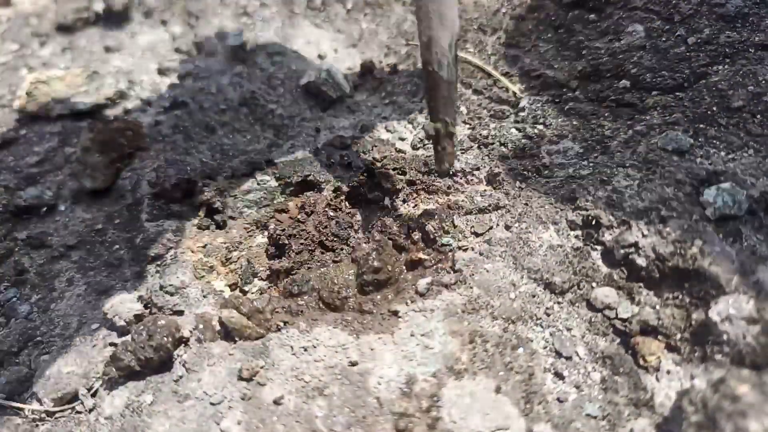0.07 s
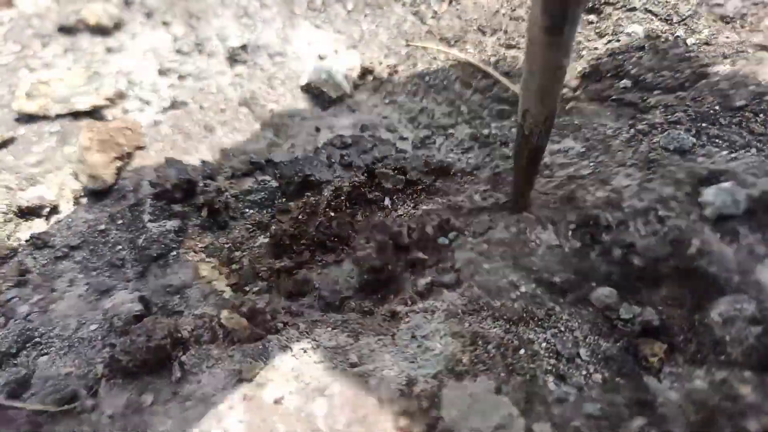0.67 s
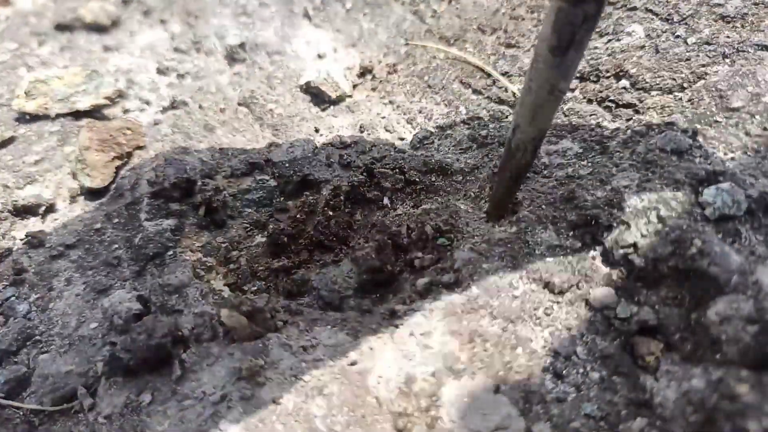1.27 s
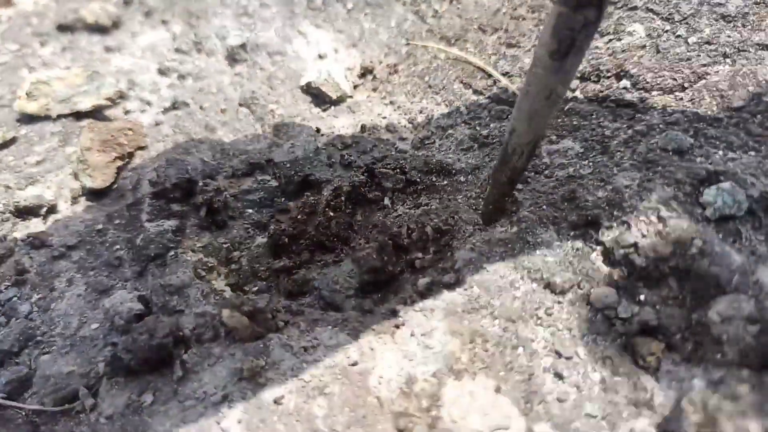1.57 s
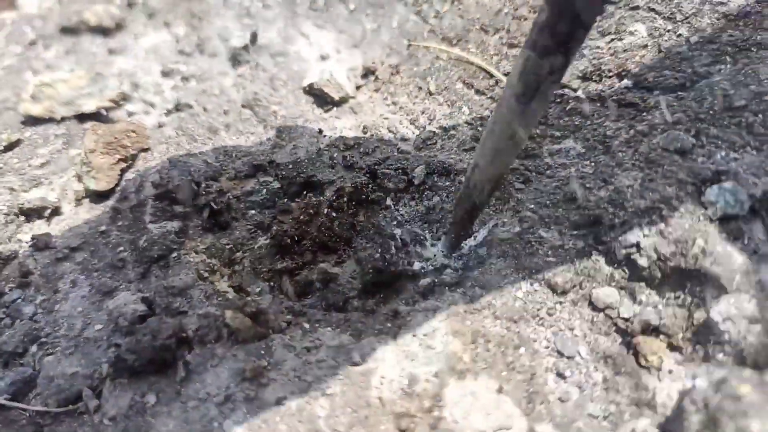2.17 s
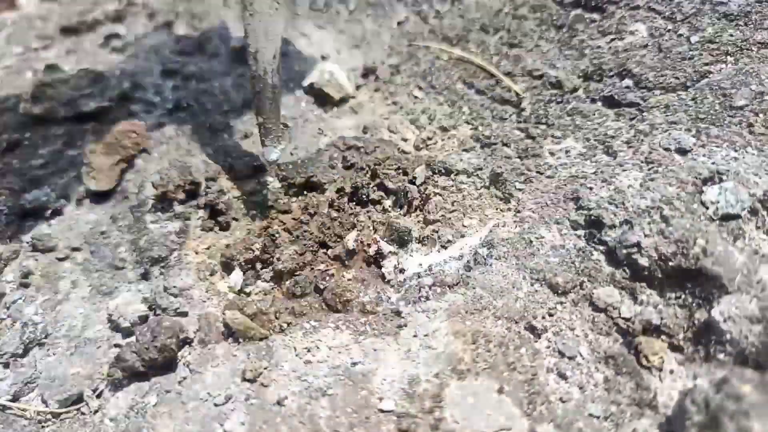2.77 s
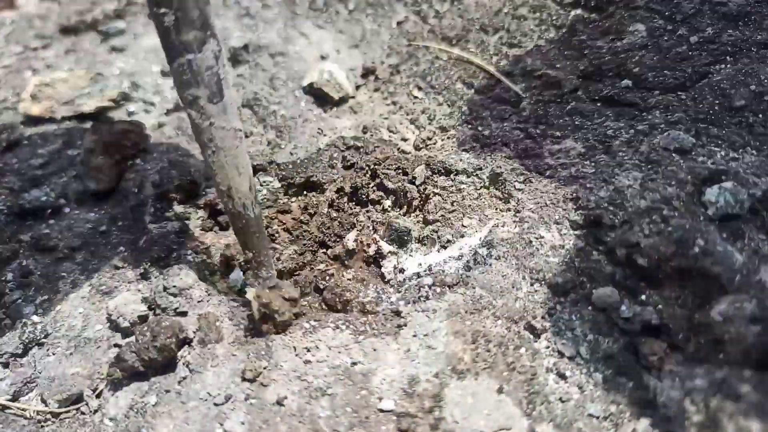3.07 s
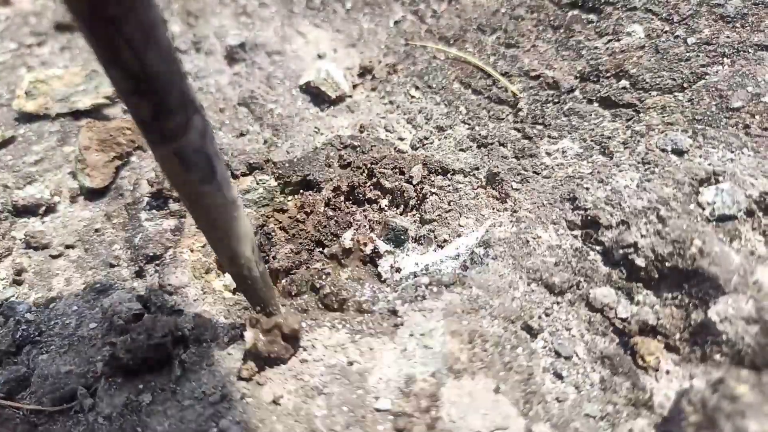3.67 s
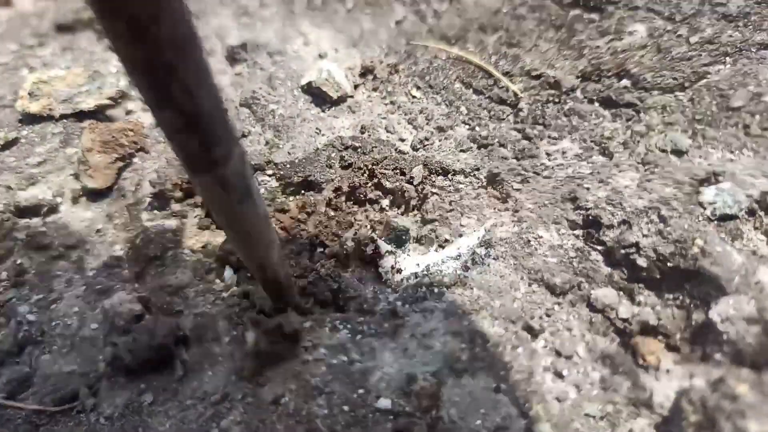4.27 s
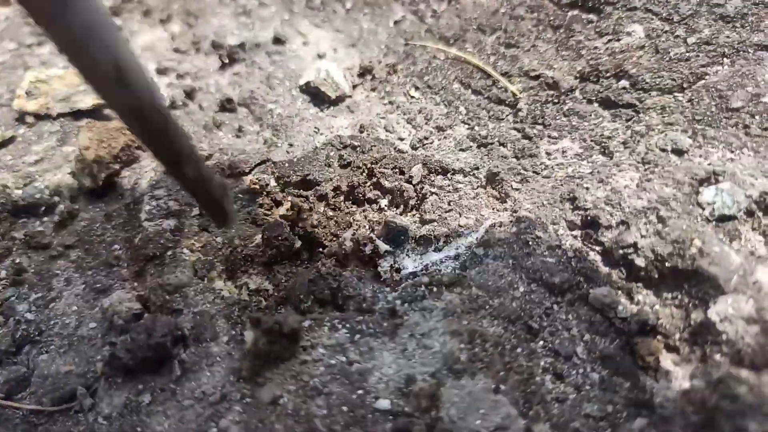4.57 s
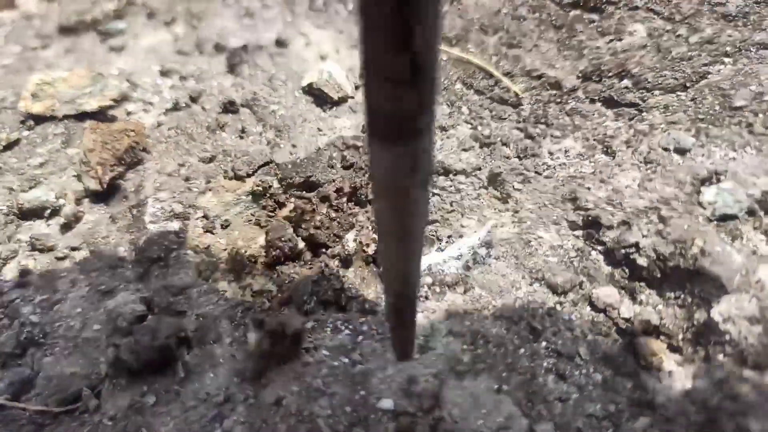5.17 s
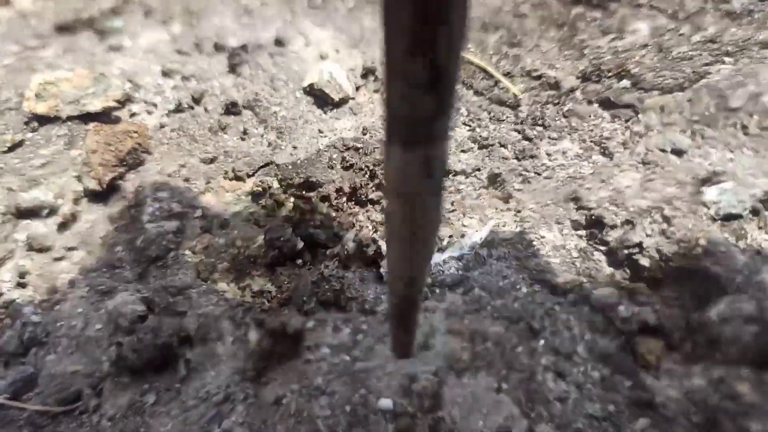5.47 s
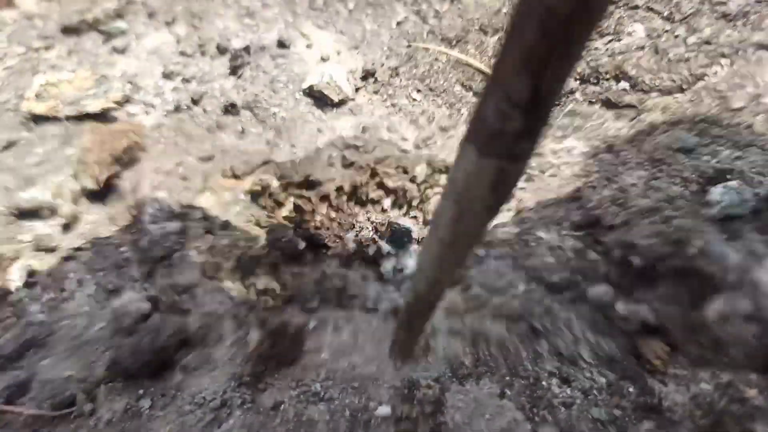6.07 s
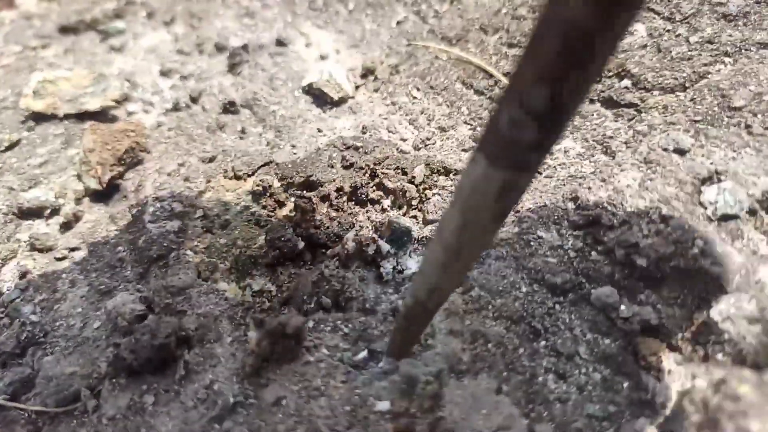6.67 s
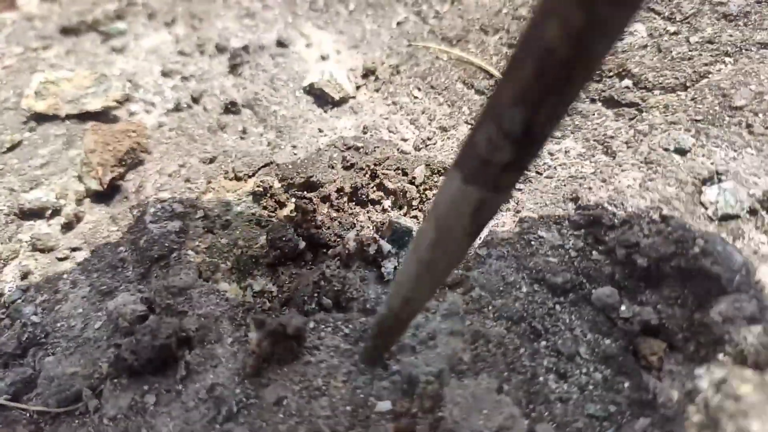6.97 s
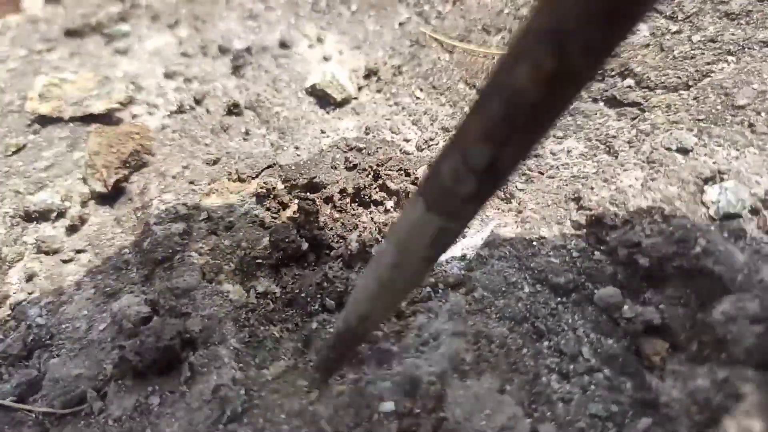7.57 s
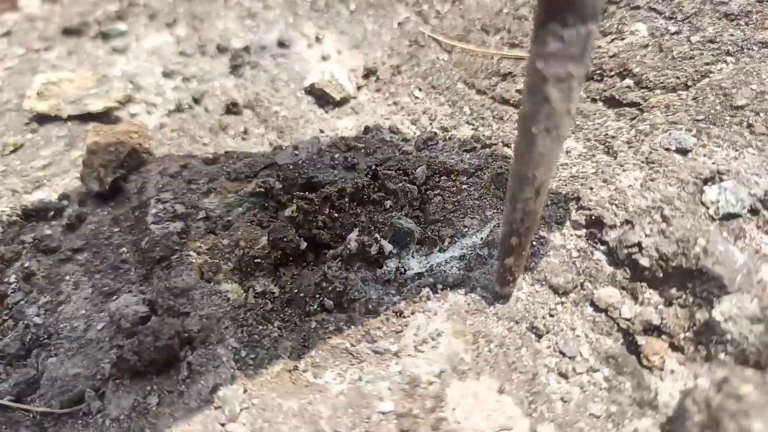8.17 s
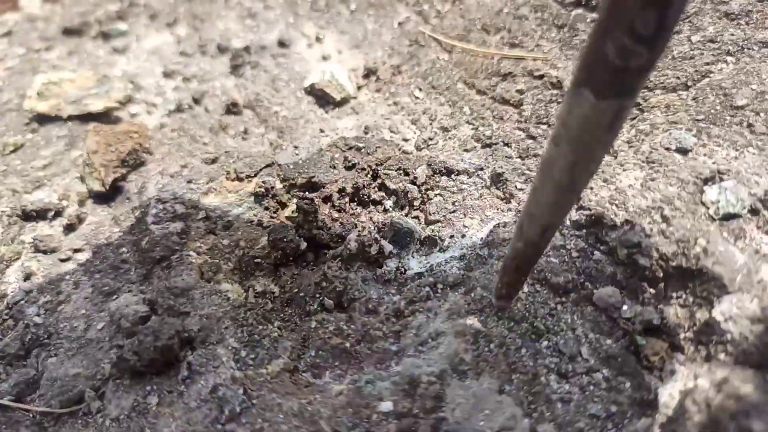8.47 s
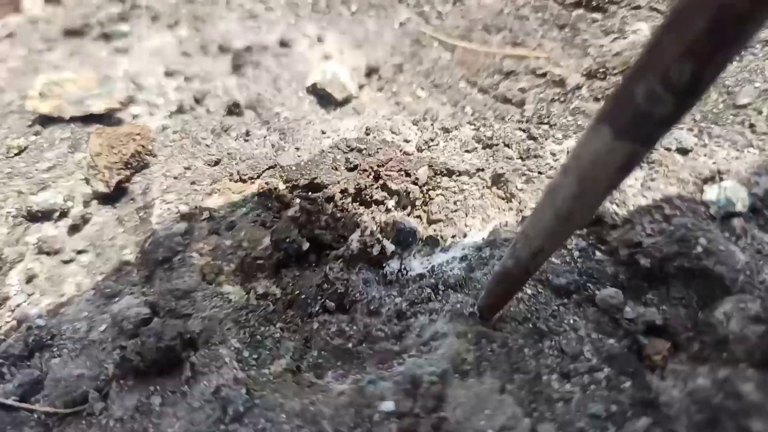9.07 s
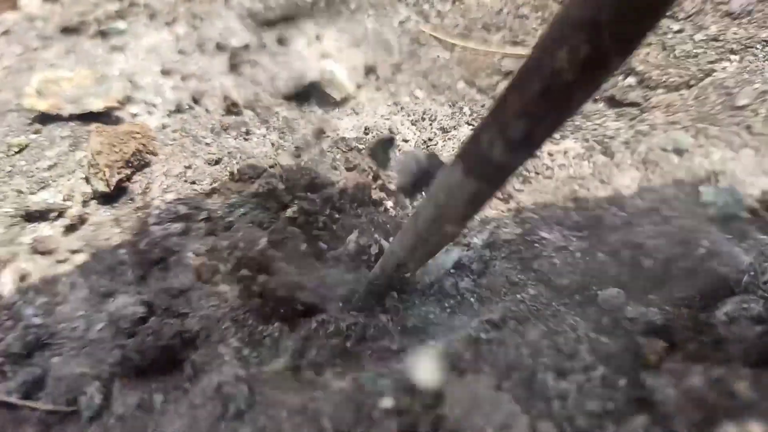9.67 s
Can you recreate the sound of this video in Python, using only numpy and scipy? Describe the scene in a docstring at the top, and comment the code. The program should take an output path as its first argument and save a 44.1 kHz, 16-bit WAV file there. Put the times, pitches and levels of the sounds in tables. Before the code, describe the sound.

Close up in a quiet outdoor spot, a metal rod taps and scrapes on rocky ground, then starts stabbing into it. The blows crush stone and thud into packed earth in quick, even runs, broken by short pauses where the tip slides and rings briefly. Loose soil hisses softly back into the hole and small pebbles tick as they land. The digging keeps going to the end.

```python
"""Sharp, gritty stabs and thumps: a pointed steel rod driven repeatedly into stony soil, close by, outdoors.
Each blow scrapes through loose grit, crushes stone, thumps the ground and throws dirt.
Crumbs trickle back and pebbles click. Between bouts the tip taps and drags, ringing the rod.
Quiet air and a low rumble lie underneath. The recorder's gain ducks after each blow."""
import sys
import numpy as np
from scipy import signal
from scipy.fft import rfft, irfft, next_fast_len
from scipy.io import wavfile
from scipy.ndimage import uniform_filter1d, minimum_filter1d

SR = 44100
rng = np.random.default_rng(int(sys.argv[2]) if len(sys.argv) > 2 else 0)


def dump(signal):
    """Clip the signal to [-1, 1] and save it as 16-bit WAV at the path in sys.argv[1]."""
    limited = np.clip(np.atleast_2d(signal).T, -1, 1)
    pcm = np.round(limited * 32767).astype(np.int16)
    wavfile.write(sys.argv[1], SR, pcm)


N = 432621
T = np.arange(-SR // 9, SR // 7) / SR  # time around one contact, s
LEFT_RIGHT = np.array([[1], [-1]])

# Table levels are relative.
# tip slides: t/s, ring/dB, half length/s, treble/dB, knock/dB
SLIDES = [(0.268, -35.5, 0.0086, -3, -44), (.495, -32.5, 0.018, -3.5, -45), (0.539, -46, .0069, -8, -41),
          (2.687, -33, 0.0096, 11.5, -44), (2.957, -61, 0.041, -8, -69), (3.029, -44, .012, 3, -32),
          (3.264, -47, 0.0025, 7.5, -45), (4.393, -19, .015, 2.5, -39.5), (4.796, -44.5, .0053, 14, -29.5),
          (4.882, -34.5, 0.014, -4, -32.5), (6.413, -45.5, 0.035, -11, -49.5), (8.0, -49, 0.012, 16.5, -71),
          (8.265, -40.5, 0.0053, -1.5, -37), (8.841, -59, 0.0548, -5.5, -71.5)]
# spectra of breaking stone, clods, dirt and crumbs: f/Hz, level/dB
STONE_SPECTRUM = [(200, -18.5), (600, -1), (900, -1), (1200, -6.5), (1750, 2.5), (2400, -0.5), (3400, 3),
                  (4700, 1.5), (6300, 0), (7700, 1), (8500, -4.5), (12000, -12.5), (15500, -8.5)]
CLOD_SPECTRUM = [(40, -19), (130, 1.5), (430, 1.5), (620, -12), (950, -17), (1500, -30), (4000, -60.5)]
DIRT_SPECTRUM = [(200, -8), (600, 6), (1100, -5.5), (1800, -0.5), (3800, 1.5), (5000, 0), (7600, -1.5),
                 (9000, -8.5), (12000, -14), (15500, -21.5)]
CRUMB_SPECTRUM = [(400, -22.5), (1500, -5.5), (4000, 0), (5500, -2), (7500, 2.5), (9000, -6), (15000, -11)]


def amp(db):
    """Decibels to gain."""
    return 10 ** (np.asarray(db) / 20)


def unit(x):
    """Scale to rms 1."""
    return x / np.sqrt(np.mean(x ** 2) + 1e-20)


def burst(x):
    """Scale to the energy of 20 ms at rms 1."""
    return x / np.sqrt(np.mean(np.sum(x ** 2, axis=-1)) / (SR / 50) + 1e-20)


def curve(points, t_s):
    """Interpolate (t/s, value) points."""
    return np.interp(t_s, *np.transpose(points))


def shape(points):
    """Response through (f/Hz, level/dB) points."""
    f, db = np.transpose(points)
    return lambda hz: amp(np.interp(np.log(hz + 1), np.log(f), db))


def peak(f, hz, width_hz):
    """One causal resonance."""
    return 1j * f * width_hz / (hz * hz - f * f + 1j * f * width_hz)


def shelf(f, db):
    """Treble shelf at 5.7 kHz."""
    return amp(db * (1 + np.tanh((f - 5700) / 1000)) / 2)


def filtered(x, response):
    """Apply a frequency response."""
    n = x.shape[-1]
    padded = next_fast_len(n + 2048)
    return irfft(rfft(x, padded) * response(np.fft.rfftfreq(padded, 1 / SR)), padded)[..., :n]


def pair(size, alike):
    """Stereo noise with correlation alike."""
    shared = rng.standard_normal(size)
    return np.sqrt(alike) * shared + np.sqrt(1 - alike) * rng.standard_normal((2, size))


def grit(size, rate_hz, spread_db):
    """Stereo noise in grains of random strength."""
    knots = rng.standard_normal(int(size * rate_hz / SR) + 2).clip(-2.5, 2.5)
    strength = np.interp(np.arange(size) * rate_hz / SR, np.arange(len(knots)), knots)
    return unit(rng.standard_normal((2, size)) * amp(spread_db * strength))


def decay(t60_s, attack_s, delay_s=0):
    """Impact envelope."""
    t = np.maximum(T - delay_s, 0)
    return (1 - np.exp(-t / attack_s)) * amp(-60 * t / t60_s)


def add(track, t_s, sound, pan_db=0):
    """Mix in a contact at t_s; pan is left minus right."""
    start = round((t_s + T[0]) * SR)
    part = (sound * amp(LEFT_RIGHT * pan_db / 2))[:, max(-start, 0):N - start]
    track[:, max(start, 0):][:, :part.shape[1]] += part


def air():
    """Quiet outdoor air; a low rumble comes and goes."""
    # air spectrum: f/Hz, level/dB
    air_spectrum = [(20, -33.5), (50, -17.5), (90, 2), (170, -4), (310, -6), (500, -12.5), (800, -16),
                    (1400, -21.5), (2800, -25), (4200, -23), (7800, -27), (12000, -34.5), (15500, -28)]
    # rumble of the surroundings: t/s, level/dB
    rumble_levels = [(0.0, -61), (0.52, -67), (1.96, -60.5), (2.95, -67.5), (6.52, -61), (6.82, -63),
                     (8.38, -66.5), (9.36, -62.5), (9.8, -65.5)]
    rumble = unit(filtered(pair(N, alike=0.71), lambda f: peak(f, 230, 280) ** 2))
    steady = unit(filtered(pair(N, alike=0.15), shape(air_spectrum)))
    rumble_db = curve(rumble_levels, np.arange(N) / SR) + 2.5
    return amp(-57.5) * steady + amp(rumble_db) * rumble


def soil_flow():
    """Envelope of running soil: spills swell, hold and die away over a steady creep."""
    # spills into the hole: t/s, level/dB, length/s
    spills = [(1.452, -65, .25), (2.15, -56.5, 0.59), (3.039, -50, 0.027), (3.18, -63, 0.15),
              (4.439, -54, 0.052), (6.499, -67, 0.98), (7.676, -56.5, 0.37)]
    rise_s, fall_s, creep_db = .04, .08, -74
    t = np.arange(N) / SR
    flow = amp(creep_db)
    for t_s, db, length_s in spills:
        envelope = np.exp(np.minimum(t - t_s, 0) / rise_s - np.maximum(t - t_s - length_s, 0) / fall_s)
        flow = np.maximum(flow, amp(db) * envelope)
    return flow


def trickle():
    """Fine soil runs back as a thin hiss; crumbs of three sizes tick in it."""
    sand = unit(filtered(grit(N, rate_hz=1100, spread_db=4.5), shape(CRUMB_SPECTRUM)))
    count, contact_s = 190, .0013
    crumbs = 0
    for hz in (3300, 6500, 7600):
        when, strength = rng.random((2, count))
        landings = np.bincount((when * N).astype(int), amp(24 * strength ** 2), N)
        envelope = signal.lfilter([1], [1, -np.exp(-1 / (contact_s * SR))], landings)
        ticks = envelope * rng.standard_normal((2, N))
        crumbs += unit(signal.lfilter(*signal.iirpeak(hz, Q=2, fs=SR), ticks))
    return soil_flow() * (amp(-4) * sand + amp(1.5) * unit(crumbs))


def pebbles():
    """Each pebble lands with a click and one broad resonance."""
    # landings: t/s, level/dB, f/Hz
    landings = [(1.278, -26.5, 7580), (1.3173, -25, 6350), (2.2165, -34.5, 7480), (2.2318, -32.5, 7700),
                (2.347, -22, 3650), (2.37, -32, 6400), (2.4067, -29.5, 7320), (2.5733, -35, 7570),
                (2.661, -30, 7440), (3.0588, -28, 3300), (3.1507, -36, 2430), (4.563, -36.5, 7540),
                (5.5578, -34.5, 6700), (6.7688, -25.5, 7530), (7.5707, -30, 7560), (7.674, -34, 3840),
                (7.7569, -24, 6650), (8.0972, -37.5, 6610)]
    envelope = decay(.006, attack_s=.0002) + amp(-16) * decay(0.036, attack_s=.001)
    track = np.zeros((2, N))
    for t_s, db, hz in landings:
        contact = envelope * pair(len(T), alike=0.067)
        click = filtered(contact, lambda f: shape(CRUMB_SPECTRUM)(f) * (1 + 1.6 * peak(f, hz, 900)))
        add(track, t_s + .0005, amp(db - 14) * burst(click))
    return track


def rod(force, free, treble_db=0):
    """The rod rings under a rough force; a buried tip favours other modes than a free one."""
    # rod modes: f/Hz, width/Hz, buried level/dB, free level/dB
    modes = [(990, 19, -21.5, 0), (1630, 330, -8, -19), (2110, 130, -11.5, -32), (2700, 130, -18, -1),
             (2870, 99, -13.5, -28), (3660, 250, -20, -15), (4696, 70, 1, 6.5), (6360, 90, 0.5, -16),
             (6570, 330, -4.5, -8), (7370, 60, -16.5, 10), (7500, 70, 0, 6), (7500, 46, 1.5, -6.5),
             (7830, 53, -3, -2.5), (8440, 55, -10, -19.5), (10200, 64, -20, 5.5), (11620, 54, -6.5, -21.5),
             (12210, 86, -15.5, -16), (12600, 140, -19.5, -20.5), (14300, 100, -20, -7)]

    def response(f):
        return sum(amp(free_db if free else buried_db) * peak(f, hz, width_hz)
                   for hz, width_hz, buried_db, free_db in modes)
    return burst(filtered(force, lambda f: response(f) * shelf(f, treble_db)))


def knock(clod_db, clod_t60_s):
    """Short ground modes, different at each spot, plus dull noise of breaking clods."""
    # ground modes: f/Hz, level/dB, t60/s
    modes = [(151, -4, .1), (193.5, 1, 0.046), (238.4, -3.5, 0.085), (325, -2, 0.051), (430.2, 3.5, 0.05),
             (495, -5, 0.039), (790, -12.5, 0.044)]
    ring = 0
    for hz, db, t60_s in modes:
        detune, level, offset, lag = rng.standard_normal(4)
        phase = 2 * np.pi * hz * np.exp(.06 * detune) * T + np.pi * offset + 0.38 * lag * LEFT_RIGHT
        ring += amp(db + 0.5 * level) * np.sin(phase) * decay(t60_s, attack_s=0.00083)
    breaking = pair(len(T), alike=0.23) * decay(clod_t60_s, attack_s=0.00029)
    clods = filtered(breaking, shape(CLOD_SPECTRUM))
    return burst(burst(ring) + amp(clod_db) * burst(clods))


def thud(hz, glide_hz, t60_s):
    """Packed soil bounces, stiffening as the rod comes to rest."""
    pitch_hz = hz * np.exp(.04 * rng.standard_normal()) + glide_hz * np.clip(T / .05, 0, 1)
    phase = 2 * np.pi * np.cumsum(pitch_hz * (T > 0)) / SR + 2 * np.pi * hz * np.minimum(T, 0)
    return burst(np.cos(phase + .25 * LEFT_RIGHT) * decay(t60_s, attack_s=0.0038, delay_s=-0.00042))


def scrapes():
    """Grit catches on the sliding tip, rasps, grinds the ground and rings the rod."""
    buried_half_s = .025  # longer slides plough with a buried tip
    track = np.zeros((2, N))
    for t_s, ring_db, half_s, treble_db, knock_db in SLIDES:
        force = np.exp(-(T / half_s) ** 2) * grit(len(T), rate_hz=900, spread_db=4.5)
        rasp_db = -26 + 0.54 * ring_db  # grows more slowly than the ring
        rasp = amp(rasp_db) * burst(filtered(force, shape(DIRT_SPECTRUM)))
        grind = amp(knock_db - 8) * burst(filtered(force, shape(CLOD_SPECTRUM)))
        ring = amp(ring_db) * rod(force, free=half_s < buried_half_s, treble_db=treble_db)
        add(track, t_s, ring + rasp + grind)
    return track


def taps():
    """Light contacts, including each slide's touchdown: a dry crack over a small knock and thud."""
    # tip set down or rebounding: t/s, crack/dB, knock/dB
    contacts = [(.2202, -25.5, -23.5), (.227, -33, -33.5), (.757, -33, -32.5), (.774, -37, -37),
                (4.308, -34.5, -28), (5.499, -29, -25.5), (6.51, -22, -30.5), (7.551, -34, -43.5),
                (9.415, -25, -27)]
    # crack spectrum: f/Hz, level/dB
    crack_spectrum = [(200, -6.5), (600, 8.5), (1100, -1), (1800, 1.5), (3500, -8), (5000, -6.5),
                      (7500, -4), (9000, -20), (15000, -26.5)]
    touchdowns = [(t_s, (ring_db + knock_db) / 2 - 5, knock_db)
                  for t_s, ring_db, _, _, knock_db in SLIDES]
    track = np.zeros((2, N))
    for t_s, crack_db, knock_db in list(contacts) + touchdowns:
        force = decay(0.017, attack_s=0.00027) * grit(len(T), rate_hz=1300, spread_db=3.5)
        crack = amp(crack_db) * burst(filtered(force, shape(crack_spectrum)))
        add(track, t_s - .001, crack + amp(knock_db) * knock(clod_db=-1.5, clod_t60_s=.06))
        add(track, t_s + .002, amp(knock_db - 7) * thud(hz=122, glide_hz=10, t60_s=0.19))
    return track


def entry(lead_s, rise_s):
    """The tip cuts through loose grit before impact: the rod sings, then rasp takes over."""
    approach = np.exp(np.minimum(T + 0.0042, 0) / rise_s) * (T > -lead_s) * (T < 0)
    ring = rod(approach * grit(len(T), rate_hz=770, spread_db=2.5), free=False)
    rasp = filtered(approach ** 3 * grit(len(T), rate_hz=2700, spread_db=2), shape(STONE_SPECTRUM))
    return ring + burst(rasp)


def dirt_spray():
    """Thrown dirt: a grainy hiss just after impact."""
    thrown = decay(.11, attack_s=.004, delay_s=.004) * grit(len(T), rate_hz=500, spread_db=5.5)
    return burst(filtered(thrown, shape(DIRT_SPECTRUM)))


def push(width_s):
    """One pressure swing as the rod is stopped, unequal left and right."""
    u = (T + .002) / width_s
    skew = rng.choice([-1, 1]) * LEFT_RIGHT
    return burst((u + skew) * np.exp(-u * u / 2))


def crush(length_s, stone_hz, treble_db):
    """Stone gives way in dense cracks that ring the rod; the struck piece clinks."""
    rise_s, fall_s, sag_db = 0.00083, 0.0018, 5.5
    t = T + 0.36 * length_s
    building = np.exp(np.minimum(t, 0) / rise_s)
    yielding = amp(-sag_db * np.clip(t / length_s, 0, 1)) * np.exp(-np.maximum(t - length_s, 0) / fall_s)
    cracks = building * yielding * grit(len(T), rate_hz=1300, spread_db=1.5)
    crunch = burst(filtered(cracks, lambda f: shape(STONE_SPECTRUM)(f) * shelf(f, treble_db)))
    phase = 2 * np.pi * (stone_hz * T + rng.random()) + .7 * LEFT_RIGHT
    clink = burst(np.sin(phase) * decay(0.015, attack_s=0.0013, delay_s=-length_s / 3))
    clink_db = -4 - 1000 * length_s  # slow crumbling clinks less
    return burst(crunch + amp(clink_db) * clink + amp(-11) * rod(cracks, free=False))


def blows():
    """Full strokes: rising scrape, crushed stone, thrown dirt, the ground's knock and thud."""
    # strokes: t/s, crush/dB, crush length/s, stone f/Hz, soil looseness/0-1, ground/dB, push/dB
    strokes = [(0.7327, -12, .0045, 1960, 0.53, -26, -38.5), (1.086, -11, .0038, 1814, 0.67, -22.5, -25),
               (1.4314, -14, 0.0049, 3010, 0.65, -19.5, -23),
               (1.7663, -11.5, 0.0043, 1676, 0.6, -19.5, -14.5),
               (2.1017, -11, 0.0028, 3550, 0.48, -20, -21), (2.4496, -10, 0.0037, 3616, 0.6, -22, -22),
               (3.6061, -14, 0.0033, 3195, 0.05, -30.5, -25),
               (3.9565, -12, 0.0038, 1637, 0.14, -22.5, -18.5),
               (4.2733, -14, 0.0028, 3024, 0.08, -22.5, -29), (5.153, -10.5, 0.0057, 2650, 0.6, -19.5, -23),
               (5.4793, -12.5, 0.0089, 2220, .95, -20.5, -25),
               (5.8022, -11.5, 0.0024, 3230, 0.35, -17, -26), (6.1401, -10.5, 0.0041, 2037, 0.76, -19, -28),
               (6.4828, -10.5, 0.0034, 2875, 0.9, -19, -17), (6.8393, -12, 0.0073, 1850, 0.64, -24.5, -28),
               (7.1825, -11.5, 0.0038, 2010, 0.74, -19.5, -19.5),
               (7.5155, -10, 0.0033, 2030, 0.58, -22, -19.5),
               (7.8492, -12.5, 0.0035, 3500, 0.67, -20.5, -25),
               (8.674, -11.5, 0.0041, 1822, 0.67, -19.5, -20), (9.0486, -11, 0.005, 2920, 0.74, -18, -17),
               (9.3952, -11, 0.0044, 2050, 0.83, -19.5, -21.5),
               (9.7517, -11.5, 0.014, 2060, 0.9, -22.5, -30)]
    # tip position: t/s, left minus right/dB
    tip_pan = [(.7, 1.5), (2.1, 2.3), (2.45, 4), (3.95, 2), (4.27, 7), (5.15, 2.4), (7.1, 2.7),
               (7.85, -0.5), (8.7, -1.1)]
    track = np.zeros((2, N))
    for t_s, crush_db, length_s, stone_hz, looseness, ground_db, push_db in strokes:
        # looser soil crunches brighter and throws more dirt
        treble_db = np.interp(looseness, (0, 1), (-11.5, 6.5))
        spray_db = np.interp(looseness, (0, 1), (-45.5, -29.5))
        scrape = amp(crush_db - 14.5) * entry(lead_s=0.017, rise_s=0.007)
        stone = amp(crush_db) * crush(length_s, stone_hz, treble_db)
        add(track, t_s, scrape + stone + amp(spray_db) * dirt_spray(), curve(tip_pan, t_s))
        # the knock starts as the stone gives way
        add(track, t_s - length_s / 2, amp(ground_db + 2) * knock(clod_db=-3, clod_t60_s=.08))
        bounce = amp(ground_db - 2) * thud(hz=90.7, glide_hz=27.1, t60_s=0.12)
        add(track, t_s, bounce + amp(push_db) * push(width_s=0.0029))
    return track


def scene():
    """All sources, close by in the open."""
    return blows() + taps() + scrapes() + pebbles() + trickle() + air()


def gain_control(x, threshold_db, depth_db, hold_s, release_s):
    """Loud peaks turn the gain down briefly."""
    hold, glide = int(hold_s * SR) | 1, int(release_s * SR) | 1
    level = np.abs(x).max(axis=0)
    held = -minimum_filter1d(-level, hold, origin=hold // 2)
    drive = held ** 2 / (held ** 2 + amp(threshold_db) ** 2)
    cut = uniform_filter1d(drive, glide, origin=glide // 2)
    return x * amp(-depth_db * cut)


def record(dry):
    """Microphone colour, gain control, soft clipping, band limit."""
    # microphone response: f/Hz, level/dB
    microphone = [(4750, -1), (4950, -6.5), (5400, -8), (6100, 0), (8300, -0.5), (9000, -12.5),
                  (10000, -25), (11250, -19), (11650, 0.5)]
    ceiling, top_hz = .97, 15700
    x = filtered(dry, shape(microphone))
    x = gain_control(x, threshold_db=-6, depth_db=1.5, hold_s=0.16, release_s=0.087)
    x = x / (1 + np.abs(x / ceiling) ** 6) ** (1 / 6)
    return filtered(x, lambda hz: (1 - np.tanh((hz - top_hz) / 170)) / 2)


dry = scene()
out = record(dry)
dump(out)
```